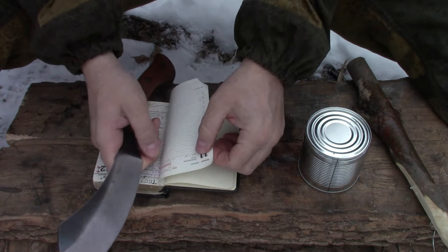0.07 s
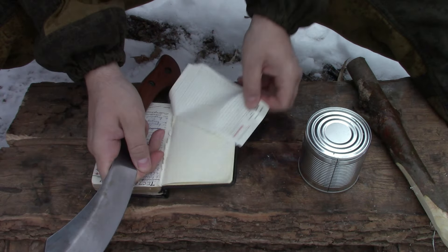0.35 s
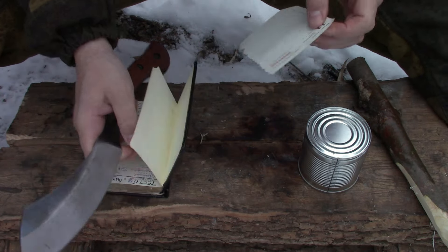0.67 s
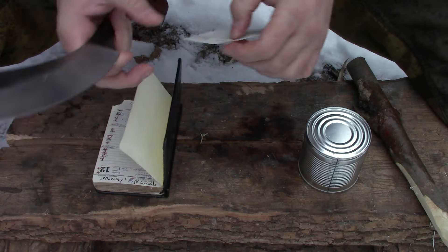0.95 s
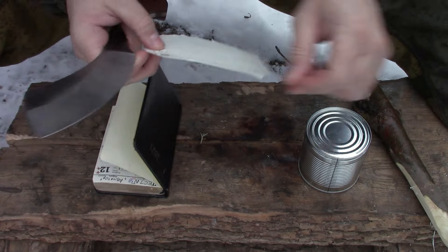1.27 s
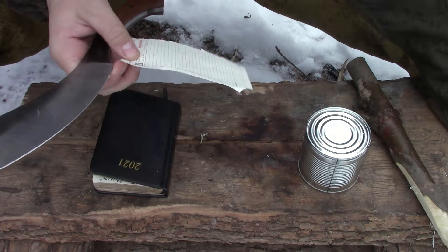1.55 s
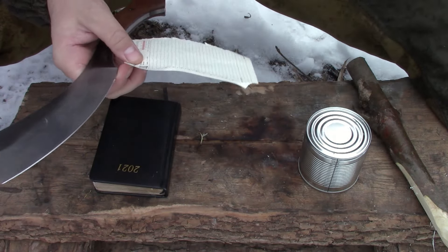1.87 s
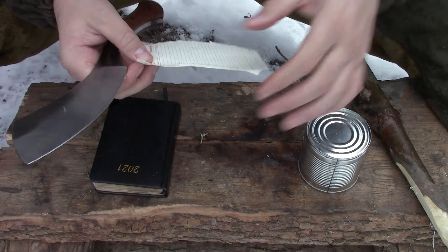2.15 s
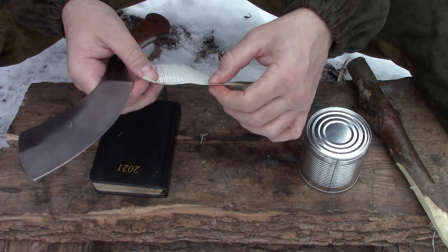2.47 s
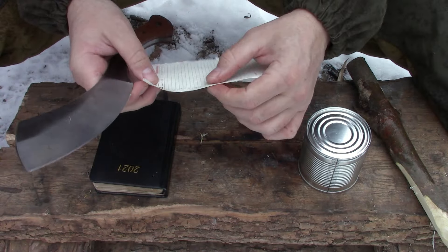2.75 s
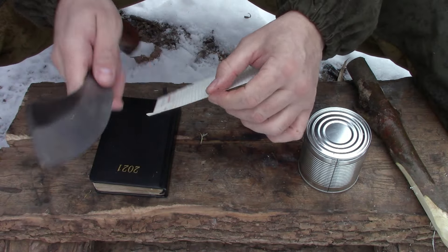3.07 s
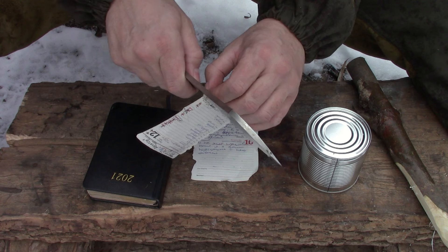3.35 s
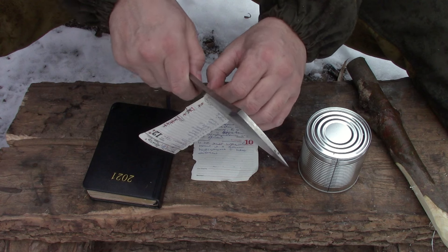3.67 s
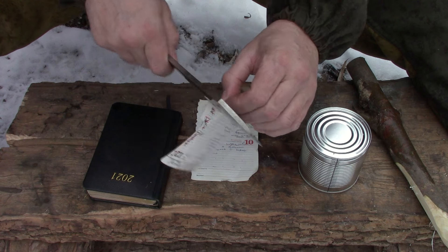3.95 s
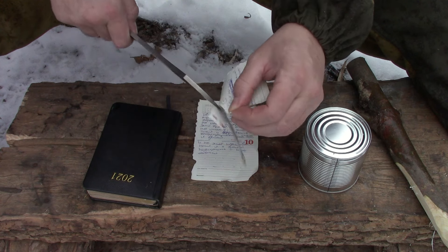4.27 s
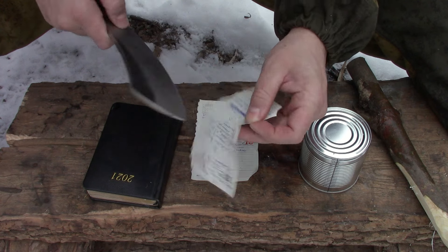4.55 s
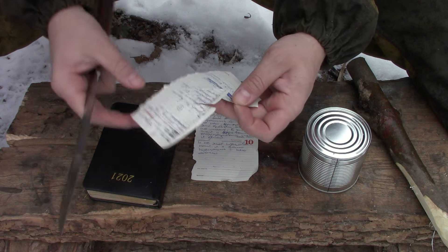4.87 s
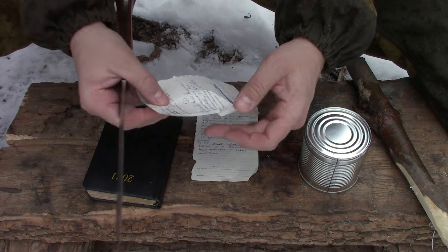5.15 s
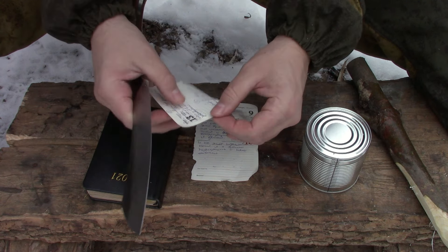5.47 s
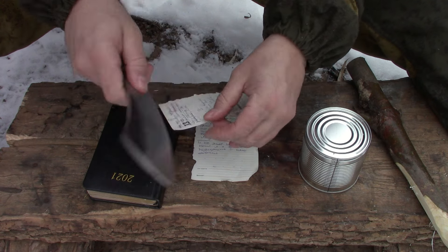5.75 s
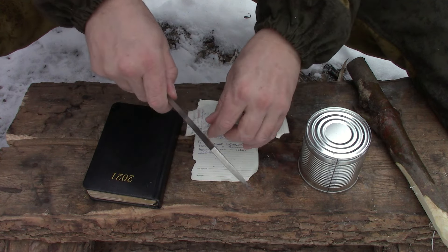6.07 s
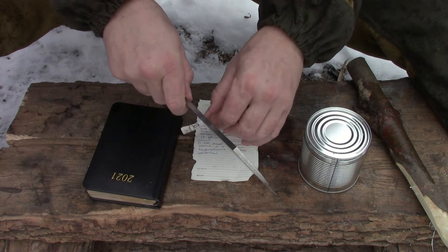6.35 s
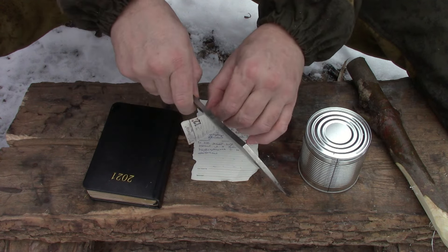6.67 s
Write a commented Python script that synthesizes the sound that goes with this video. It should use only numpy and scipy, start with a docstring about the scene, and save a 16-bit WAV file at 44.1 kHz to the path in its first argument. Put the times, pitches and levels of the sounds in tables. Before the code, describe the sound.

Close to the microphone outdoors, a short, jerky rip pulls a leaf from a pocket diary. The cover bumps softly, a hand slides over cloth, and jacket sleeves swish between faint paper ticks. Then a big knife skates on the paper's rim with a thin steel zing and cuts through in one short, bright stroke. Small crinkles and taps follow, with a dull, faraway rush of air underneath.

```python
"""Outdoors at a plank table, a page is ripped out of a pocket diary, held taut and sliced with a big knife.
Fibres break in dense crackles that ring the sheet; the steel zings on the rim before it bites.
The loose sheet buckles and brushes the fingers, pages and covers bump, a hand wipes over cloth.
Jacket sleeves swish over a quiet, distant rush of air. Close and nearly mono."""
import sys
import numpy as np
from scipy import signal
from scipy.fft import rfft, irfft
from scipy.io import wavfile
from scipy.ndimage import uniform_filter1d, map_coordinates

SR = 44100
rng = np.random.default_rng(int(sys.argv[2]) if len(sys.argv) > 2 else 0)


def digitize_waveform(pressure):
    """Quantize a signal to 16-bit integers and store it at the path in sys.argv[1].

    Rows of a 2-D input are taken as channels; values are limited to [-1, 1].
    """
    field = np.atleast_2d(pressure).T
    bounded = np.clip(field, -1, 1)
    quanta = np.round(bounded * 32767).astype(np.int16)
    wavfile.write(sys.argv[1], SR, quanta)


N = 295911
TIME_S = np.arange(N) / SR
CUTOFF_HZ = 15800

# friction spectra: freq_hz, gain_db
TEAR_SPECTRUM = [(60, -32.5), (130, -24), (240, -8), (430, -14.5), (800, -4), (1100, -4.5), (1900, -5),
                 (2700, -6), (3600, 3), (5200, -6.5), (6600, -6), (9000, -11.5), (11500, -13),
                 (15000, -31.5)]
SLICE_SPECTRUM = [(100, -15.5), (220, -26), (380, -2), (750, -8.5), (1000, -2.5), (1420, -0.5),
                  (1900, -8.5), (2550, -5), (5300, -3.5), (7200, -2), (10300, -6.5), (11700, -7.5),
                  (13200, -18), (16000, -21)]
BRUSH_SPECTRUM = [(200, 0), (1000, 11.5), (3000, -3), (7000, 5), (11000, 3), (13500, -9), (16000, -13)]
WIPE_SPECTRUM = [(100, -19), (300, -15), (550, -7.5), (900, -1.5), (1500, 0.5), (2100, -6), (2600, 1),
                 (4500, -2.5), (6500, -8), (12000, -10.5), (14000, -20), (16000, -27)]
SLEEVE_SPECTRUM = [(200, -16), (500, 4), (1200, -0.5), (2000, -3), (3500, -4), (7000, -9), (11000, -11.5),
                   (13500, -20.5), (16000, -24.5)]
# air spectra, mid and side: freq_hz, gain_db
AIR_MID_SPECTRUM = [(15, -58.5), (25, -28), (102, -6), (200, -6), (256, -4.5), (293, -5), (326, -5),
                    (451, -6.5), (607, -5.5), (1230, -15), (2610, -30.5), (2840, -25), (3520, -32),
                    (5430, -34), (16000, -51)]
AIR_SIDE_SPECTRUM = [(15, -31.5), (25, -4.5), (92, -3), (175, 0.5), (560, -2.5), (2910, -16.5),
                     (12500, -29.5), (16000, -13.5)]
# resonances: pitch_hz, width_hz, gain_db
PAGE_MODES = [(1290, 31, -8.5), (2530, 34, -3), (2880, 37, 2.5), (3940, 120, -2.5), (4290, 33, -10.5),
              (6080, 1300, -8), (8320, 93, -11), (11100, 40, -13.5)]
TAUT_SHEET_MODES = [(947, 54, 4.5), (1385, 150, 2), (2610, 140, 9.5), (3570, 200, 7), (4180, 130, 5),
                    (5150, 140, -17), (6580, 350, 4), (7340, 92, 6), (7940, 120, 7.5), (8580, 140, 11.5),
                    (9870, 170, -17), (11500, 270, 1)]
BLADE_MODES = [(2870, 120, 5), (3500, 120, 6.5), (4140, 260, 4.5), (5300, 120, -3), (6140, 190, -7.5),
               (7070, 200, 2.5), (8350, 210, 4), (9250, 230, -1.5), (10750, 150, -19), (12300, 180, -11)]
# the rip hangs on tough spots: centre_s, half_width_s, dip_db
RIP_STALLS = [(0.373, .005, -8.5), (0.412, 0.005, -9)]
# steel sings as the edge leaves the paper: start_s, level_db, pitch_hz, t60_s
BLADE_RINGS = [(4.62, -62, 5170, .8), (4.63, -67, 3800, 0.59), (5.425, -55, 4470, 0.23)]
# paper snaps, buckles or is tapped: start_s, level_db, ring_hz, top_hz, decay_s
PAPER_SNAPS = [ (0.0183, -13, 2800, 5400, .0015), (0.0274, -22, 1590, 3200, 0.0032),
               (0.274, -13.5, 1242, 5000, .0037), (0.2885, -7.5, 1104, 4500, .0025),
               (0.309, -7, 3360, 8050, 0.0048), (0.345, -13, 3990, 8000, .002),
               (0.376, -5.5, 3580, 9000, 0.0026), (0.412, -8.5, 3240, 7100, .0033),
               (0.468, -16.5, 2580, 6000, .002), (0.536, -24.5, 1027, 2000, 0.0013),
               (0.725, -37, 1330, 5000, 0.0028), (0.762, -28, 3270, 10600, 0.0019),
               (0.784, -29.5, 1835, 3390, 0.0015), (1.172, -38, 514, 9960, .004),
               (1.185, -29, 460, 8000, .0013), (1.594, -21, 720, 4000, .0013),
               (1.856, -24, 385, 3000, 0.0013), (2.385, -45, 1380, 3000, .003),
               (2.462, -45.5, 890, 2000, .006), (2.665, -41, 910, 9000, 0.002),
               (2.826, -29.5, 923, 2210, 0.0019), (3.887, -33.5, 2970, 9000, 0.0056),
               (3.976, -21, 3940, 12000, 0.0014), (4.14, -25, 1403, 5000, 0.0098),
               (4.184, -25.5, 1434, 9000, 0.003), (4.235, -37, 2850, 3000, .0024),
               (4.563, -26, 2310, 5540, 0.0054), (4.602, -28.5, 1064, 3500, 0.0028),
               (4.946, -40, 2950, 9150, 0.0028), (5.098, -38, 875, 7000, 0.005),
               (5.110, -27, 1034, 6000, 0.0062), (5.127, -22.5, 942, 2400, 0.0028),
               (5.128, -17.5, 1875, 7540, 0.0015), (5.441, -30, 4310, 9150, 0.0027),
               (6.598, -30, 2680, 4960, 0.0017)]
# the sheet is fingered: start_s, end_s
FINGERING_SPANS = [(0.6, 1.0), (2.35, 3.0), (4.25, 6.1)]
# fingers and blade brush the sheet: start_s, length_s, level_db, treble_lift_db
BRUSH_STROKES = [ (0.236, 0.03, -36.5, -23), (0.637, 0.065, -51.5, 7), (0.713, 0.085, -53, 4),
                 (0.855, 0.091, -57, 3), (1.157, 0.05, -46, -6.5), (1.346, 0.049, -57, 0),
                 (1.79, 0.075, -49, -5), (1.963, 0.0085, -44, 14), (2.222, 0.16, -55.5, -28),
                 (2.578, 0.015, -53, 13), (2.979, 0.017, -54.5, 7), (4.264, 0.027, -49.5, -6),
                 (4.331, 0.015, -49, -20), (4.406, 0.033, -43.5, 8), (4.491, 0.045, -41.5, 19),
                 (4.544, 0.087, -40.5, -22), (5.121, 0.029, -40, -5), (5.407, 0.099, -47.5, -7),
                 (5.54, 0.031, -46.5, -9), (5.613, 0.029, -46.5, 2.5), (5.875, 0.066, -57, -28),
                 (6.051, 0.068, -52.5, -18.5)]
# soft bumps of pages and covers, and a finger humming on a page: start_s, level_db, pitch_hz, t60_s
DIARY_TONES = [(0.054, -40.5, 265, 0.24), (0.217, -34.5, 282, 0.27), (1.169, -38, 320, 0.1),
               (1.595, -26, 218, 0.035), (2.826, -25.5, 585, 0.023), (3.66, -48.5, 82, .12),
               (4.29, -47, 71, .07), (4.971, -32, 230, 0.038), (4.971, -35, 765, 0.047),
               (5.128, -29, 520, 0.028), (5.444, -43, 225, 0.068)]
# an arm moves in its sleeve: start_s, length_s, level_db, brightness_db
ARM_MOVES = [(-0.1, 0.34, -54.5, 1), (0.445, 0.49, -59.5, -1), (1.278, 0.32, -57, 0.5),
             (1.837, 0.56, -59.5, -2), (2.875, 0.36, -62, 2), (4.297, 0.694, -60, 0.5),
             (5.126, 0.5, -65, -0.5), (5.612, 0.32, -59.5, 1)]


def page_rip(start_s=.2545, hardest_s=.3, free_s=.46):
    """Jerky bundles of fibres break along the binding and shake the leaf; once free it flutters, duller."""
    clicks = fibres(rate_hz=3300, spread_db=2, clump_db=3, clump_hz=450)
    clicks = edge_echo(clicks, lag_s=.001, echo_db=-6, wander_hz=22)
    ring = resonances(clicks, PAGE_MODES, bend_share=.035, bend_hz=25)
    leaf = coloured(clicks, TEAR_SPECTRUM) + from_db(-6) * ring
    stall_db = sum(dip_db * np.exp(-np.minimum(((TIME_S - centre_s) / half_s) ** 2, 20))
                   for centre_s, half_s, dip_db in RIP_STALLS)
    pull_db = effort_db(start_s, hardest_s, free_s, start_db=-9.5, end_db=-13.5)
    free = TIME_S > free_s
    rip = set_bands(leaf, body_db=-20 + .45 * pull_db - 2 * free, rasp_db=-17 + pull_db - 3.5 * free,
                    fizz_db=-23 + .41 * pull_db - 11 * free)
    return from_db(stall_db) * envelope(start_s, free_s, attack_s=.002, release_s=.039) * rip


def knife_slice(start_s=3.874, hardest_s=4.11, end_s=4.19):
    """The edge parts the taut sheet fibre by fibre; the body fills in as the cut flap grows."""
    clicks = fibres(rate_hz=7000, spread_db=2, clump_db=1.8, clump_hz=400)
    clicks = edge_echo(clicks, lag_s=.0013, echo_db=-10, wander_hz=45)
    ring = resonances(clicks, TAUT_SHEET_MODES, bend_share=.012, bend_hz=30)
    sheet = coloured(clicks, SLICE_SPECTRUM) + from_db(-3) * ring
    push_db = effort_db(start_s, hardest_s, end_s, start_db=-17.5, end_db=-8.5)
    uncut = 1 - progress(start_s, end_s)
    slicing = set_bands(sheet, body_db=-33 - 28 * uncut ** 3, rasp_db=-27.5 + push_db,
                        fizz_db=-31 + .59 * push_db)
    return envelope(start_s, end_s, attack_s=.0043, release_s=.0097) * slicing


def blade_skate(start_s=3.733, end_s=3.888):
    """The edge skates on the sheet's rim; the steel zings, louder and brighter until it bites."""
    clicks = fibres(rate_hz=23000, spread_db=9, clump_db=-1.5, clump_hz=180)
    ring = resonances(clicks, BLADE_MODES, bend_share=.02, bend_hz=24)
    steel = ring + from_db(-5) * coloured(clicks, SLICE_SPECTRUM)
    to_go = 1 - progress(start_s, end_s)
    zing = set_bands(steel, body_db=-76, rasp_db=-47 - 14 * to_go, fizz_db=-46 - 20 * to_go)
    return envelope(start_s, end_s, attack_s=.012, release_s=.039) * zing


def paper_snaps(rows, low_hz=450, overtone_db=-5, ring_stretch=2.6, flutter_db=-15, flutter_s=.011):
    """Each snap: a quick crack, a ring of the bent panel, a dull flutter dying in the sheet."""
    out, age_s = np.zeros(N), TIME_S[:4096]
    harmonic = np.arange(1, 5)[:, None]
    for start_s, level_db, ring_hz, top_hz, decay_s in rows:
        decay = np.exp(-age_s / decay_s)
        attack = np.minimum(age_s / (.16 * decay_s) + .01, 1)   # a slow buckle starts softly
        crack, flutter = rng.standard_normal((2, len(age_s)))
        crack = unit_rms(butter(butter(crack * decay, top_hz, "low", order=3), low_hz, "high"))
        partial_hz = harmonic * ring_hz
        rolloff = (partial_hz < CUTOFF_HZ) / np.hypot(1, (partial_hz / top_hz) ** 2)
        detune = rng.normal(1, .021, harmonic.shape)
        partials = from_db(overtone_db * (harmonic - 1)) * np.sin(2 * np.pi * partial_hz * detune * age_s)
        panel = unit_rms((rolloff * partials).sum(axis=0) * decay ** (1 / ring_stretch))
        ring_db = 1 - 2.5 * np.log2(ring_hz / 1000)   # big, low panels ring most
        hit = unit_rms(attack * (crack + from_db(ring_db) * panel)) * np.sqrt(np.mean(decay ** 2))
        flutter = unit_rms(butter(butter(flutter, 2200, "low"), low_hz, "high"))
        flutter *= np.exp(-age_s / flutter_s) * (1 - decay)
        add(out, start_s, from_db(level_db) * (hit + from_db(flutter_db) * flutter))
    return butter(butter(out, 11500, "low", order=3), 330, "high", order=3)


def finger_ticks(rate_hz=6.9, level_db=-49.5, spread_db=4, ring_hz=3000, top_hz=10000, decay_s=.002):
    """The fingered sheet ticks faintly at random; returns rows like PAPER_SNAPS."""
    rows = []
    for start_s, end_s in FINGERING_SPANS:
        span_s = end_s - start_s
        for when, force, pitch in rng.random((40, 3))[:int(rate_hz * span_s)]:
            tick_db = level_db + spread_db * (2 * force - 1)
            tick_hz = ring_hz * 2 ** (2 * pitch - 1)
            rows.append((start_s + when * span_s, tick_db, tick_hz, top_hz, decay_s))
    return rows


def paper_brushes(treble_hz=4500, attack_share=.2):
    """Fingers and blade graze the sheet: short swells of fine friction."""
    out = np.zeros(N)
    clicks = fibres(rate_hz=7000, spread_db=8.5, clump_db=10.5, clump_hz=67)
    ring = resonances(clicks, BLADE_MODES, bend_share=.061, bend_hz=5.1)
    rasp = coloured(clicks, BRUSH_SPECTRUM) + from_db(-3) * ring
    dull = butter(rasp, treble_hz, "low", order=1)
    for start_s, length_s, level_db, lift_db in BRUSH_STROKES:
        done = np.linspace(0, 1, int(length_s * SR))
        span = slice(int(start_s * SR), int(start_s * SR) + len(done))
        brush = unit_rms(dull[span] + from_db(lift_db) * (rasp[span] - dull[span]))
        swell = np.minimum(done / attack_share, 1) * np.sqrt(1 - done ** 2)
        add(out, start_s, from_db(level_db) * brush * swell)
    return out


def cloth_wipe(start_s=1.579, end_s=1.859):
    """A hand slides over cloth: a fine rasp that thins a little on the way."""
    clicks = fibres(rate_hz=16000, spread_db=3, clump_db=5, clump_hz=24)
    cloth = coloured(clicks, WIPE_SPECTRUM)
    rub = set_bands(cloth, body_db=-36 - 3 * progress(start_s, end_s), rasp_db=-38, fizz_db=-42)
    return envelope(start_s, end_s, attack_s=.0086, release_s=.0067) * rub


def contact_tones(rows, rise_s):
    """Each soft contact starts one damped tone."""
    out, age_s = np.zeros(N), TIME_S[:SR // 2]
    attack = 1 - np.exp(-age_s / rise_s)
    for start_s, level_db, pitch_hz, t60_s in rows:
        gain = attack * from_db(level_db - 60 * age_s / t60_s)
        add(out, start_s, gain * np.sin(2 * np.pi * pitch_hz * age_s))
    return out


def sleeves(rest_db=-67):
    """Jacket cloth swishes with the arms, never quite still; bright moves trade body for fizz."""
    clicks = fibres(rate_hz=29000, spread_db=4.5, clump_db=2.5, clump_hz=110)
    band_power = from_db(rest_db) ** 2
    for start_s, length_s, level_db, brightness_db in ARM_MOVES:
        tilt_db = brightness_db * np.array([[-1], [0], [1]])
        move = envelope(start_s, start_s + length_s, attack_s=.063, release_s=.07)
        band_power = band_power + (from_db(level_db + tilt_db) * move) ** 2
    body_db, rasp_db, fizz_db = 10 * np.log10(band_power)
    return set_bands(coloured(clicks, SLEEVE_SPECTRUM), body_db + 1.5, rasp_db, fizz_db - 6)


def distant_air(mid_db=-56.23, waver_db=1.03, side_db=-65, low_hz=45):
    """A far, dull rush; a little rumble and hiss differ left to right."""
    mid = from_db(mid_db + waver_db * drift(6)) * coloured(rng.standard_normal(N), AIR_MID_SPECTRUM)
    side = from_db(side_db) * coloured(rng.standard_normal(N), AIR_SIDE_SPECTRUM)
    return butter(mid + side * np.array([[1], [-1]]), low_hz, "high")


def fibres(rate_hz, spread_db, clump_db, clump_hz):
    """Fibres catch and break at random, in clumps; the pull keeps their mean power even."""
    sizes = from_db(spread_db * np.clip(rng.standard_normal(N), -2, 2) + clump_db * drift(clump_hz))
    clicks = (rng.random(N) < rate_hz / SR) * rng.choice([-1, 1], N) * sizes
    local_power = np.abs(uniform_filter1d(clicks ** 2, size=900))
    return clicks / np.sqrt(local_power + 1e-6)


def edge_echo(clicks, lag_s, echo_db, wander_hz, wander_share=.25):
    """Clicks return from the sheet's edge; the path changes, so the colour shifts."""
    lag_samples = lag_s * SR * (1 + wander_share * drift(wander_hz))
    echo = np.take(clicks, (np.arange(N) - lag_samples).astype(int), mode="clip")
    return clicks + from_db(echo_db) * echo


def resonances(clicks, modes, bend_share, bend_hz):
    """Parallel modes whose pitch wanders as the part flexes; rms 1."""
    ring = np.zeros(N)
    for pitch_hz, width_hz, gain_db in modes:
        radius = np.exp(-np.pi * width_hz / SR)
        feedback = [1, -2 * radius * np.cos(2 * np.pi * pitch_hz / SR), radius ** 2]
        ring += from_db(gain_db) * signal.lfilter([1 - radius, 0, radius - 1], feedback, clicks)
    read_position = np.cumsum(1 + bend_share * drift(bend_hz))
    return unit_rms(map_coordinates(ring, [read_position], mode="mirror"))


def set_bands(sound, body_db, rasp_db, fizz_db, edges_hz=(2000, 8000), low_hz=110):
    """Set low (body), middle (rasp) and high (fizz) levels; thin sheets radiate no bass."""
    body = butter(butter(sound, edges_hz[0], "low", order=5), low_hz, "high")
    rasp = butter(sound, edges_hz, "band", order=5)
    fizz = butter(sound, edges_hz[1], "high", order=5)
    return sum(from_db(db) * unit_rms(x) for db, x in [(body_db, body), (rasp_db, rasp), (fizz_db, fizz)])


def coloured(x, spectrum, size=4096):
    """Minimum-phase filter following a spectrum table; rms 1."""
    freq_hz, gain_db = np.transpose(spectrum)
    grid_hz = np.maximum(np.arange(size // 2 + 1) * SR / size, 1)
    grid_db = np.interp(np.log(grid_hz), np.log(freq_hz), gain_db)
    cepstrum = irfft(np.log(from_db(grid_db)))
    cepstrum[1:size // 2] *= 2
    cepstrum[size // 2 + 1:] = 0
    impulse = irfft(np.exp(rfft(cepstrum)))
    return unit_rms(signal.oaconvolve(x, impulse)[:N])


def effort_db(start_s, hardest_s, end_s, start_db, end_db):
    """Hand force: a rounded arch, 0 dB at the hardest moment."""
    return start_db * (1 - progress(start_s, hardest_s)) ** 2 + end_db * progress(hardest_s, end_s) ** 2


def envelope(start_s, end_s, attack_s, release_s):
    """Linear rise, hold, exponential release."""
    return progress(start_s, start_s + attack_s) * np.exp(-np.clip((TIME_S - end_s) / release_s, 0, 20))


def progress(start_s, end_s):
    """Share of a movement done, 0 to 1."""
    return np.clip((TIME_S - start_s) / (end_s - start_s), 0, 1)


def drift(rate_hz):
    """Random wander, spread about 1."""
    return np.interp(TIME_S * rate_hz, np.arange(N // 20), rng.standard_normal(N // 20))


def butter(x, corner_hz, kind, order=2):
    """Butterworth low-, high- or band-pass."""
    return signal.sosfilt(signal.butter(order, corner_hz, kind, fs=SR, output="sos"), x)


def add(track, start_s, sound):
    """Mix in a short sound."""
    first = int(start_s * SR)
    track[first:first + len(sound)] += sound[:max(N - first, 0)]


def from_db(db):
    """Decibels to gain."""
    return 10 ** (np.asarray(db) / 20)


def unit_rms(x):
    """Scale to rms 1."""
    return x / np.sqrt(np.mean(x ** 2) + 1e-20)


def scene(skew_samples=.04):
    """Near sources straight ahead, a fraction of a sample apart left to right, over the air."""
    near = page_rip() + blade_skate() + knife_slice()
    near += paper_snaps(PAPER_SNAPS + finger_ticks()) + paper_brushes()
    near += cloth_wipe() + sleeves()
    near += contact_tones(DIARY_TONES, rise_s=.0024) + contact_tones(BLADE_RINGS, rise_s=.013)
    side = skew_samples * np.gradient(near)
    return near + side * np.array([[1], [-1]]) + distant_air()


def record(dry):
    """Soft peak limit, then a steep low-pass."""
    rounded = dry / (1 + (dry / .84) ** 6) ** (1 / 6)
    return signal.sosfilt(signal.ellip(12, .1, 80, CUTOFF_HZ, fs=SR, output="sos"), rounded)


dry = scene()
out = record(dry)
digitize_waveform(out)
```